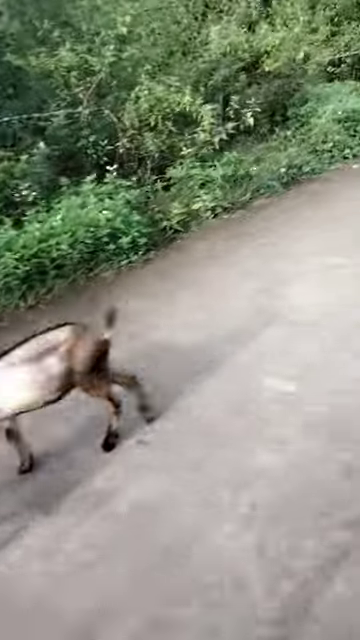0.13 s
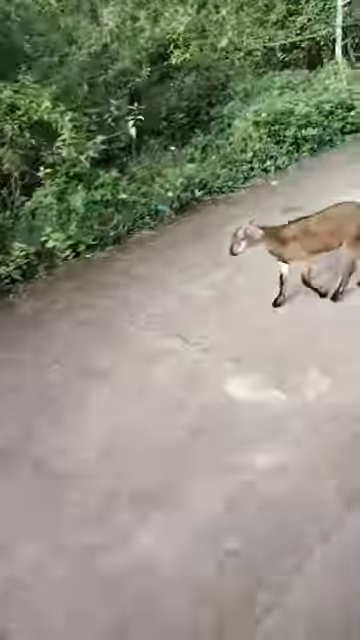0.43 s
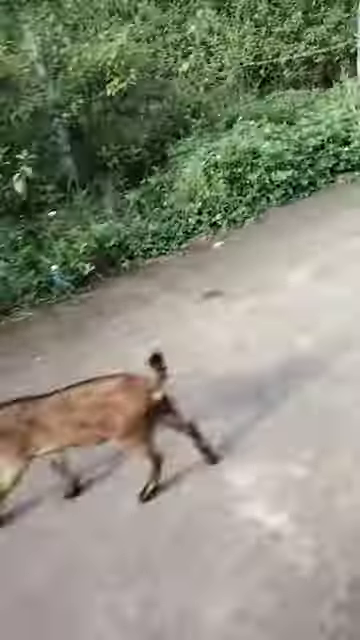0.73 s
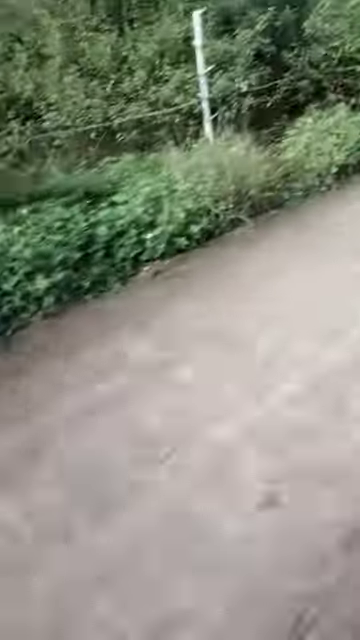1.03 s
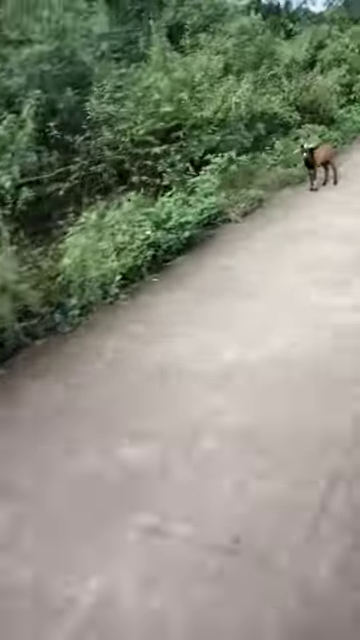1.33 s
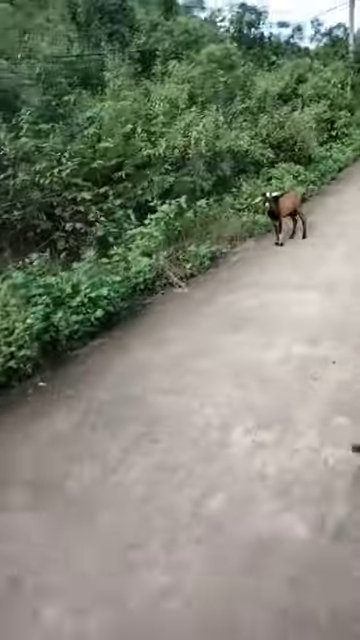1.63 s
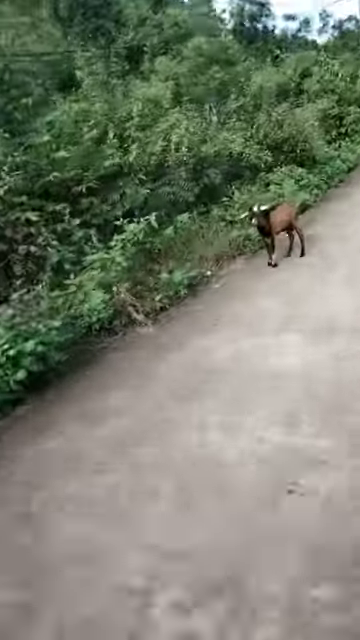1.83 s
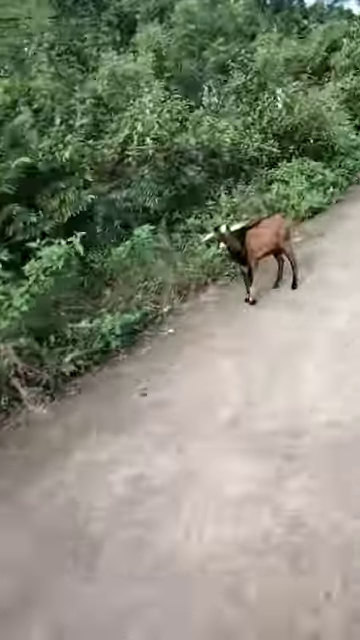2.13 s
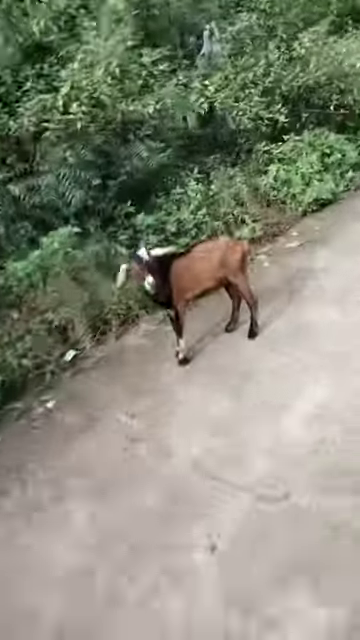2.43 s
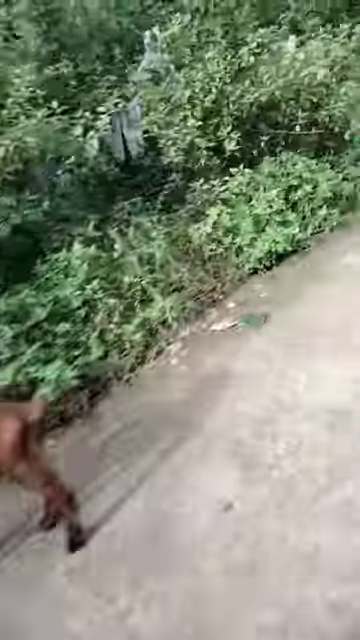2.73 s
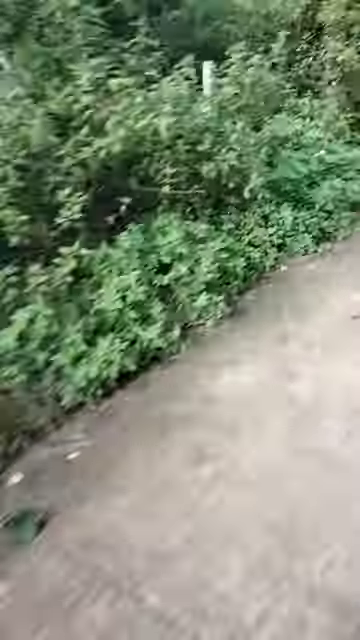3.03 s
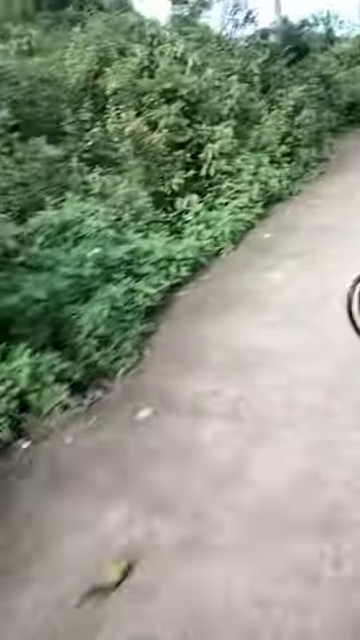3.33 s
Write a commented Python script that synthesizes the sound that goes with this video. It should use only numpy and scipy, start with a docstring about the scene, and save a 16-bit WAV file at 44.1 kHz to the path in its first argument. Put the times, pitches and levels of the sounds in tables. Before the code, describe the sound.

A motorbike rolls at low, nearly steady revs, about twenty soft exhaust pulses a second, heard close from the saddle outdoors. Casing clatter, tyre noise, faint whine and bright metallic sizzle run throughout. Wind buffets the microphone, with dull slaps and the strongest roar around 1.1-1.45 s, easing, then gusting again from 2.5 s to the end. Loose metal ticks at irregular moments, sharpest near 2.4 s.

```python
"""Motorbike on a concrete road

A single-cylinder motorbike rolls along a concrete country road at low revs, heard from the saddle.
Wind is shaped noise under gusts, with single slaps; the exhaust is about twenty pulses a second through
resonances. Noise bursts ring the casing over rolling noise and a faint whine. Sparse grains in shaped
noise make the running gear sizzle, and short bursts of the same colour make sharp ticks of loose metal.
"""
import sys
import numpy as np
from scipy import signal
from scipy.fft import rfft, irfft
from scipy.io import wavfile
from scipy.ndimage import map_coordinates

SR = 44100
rng = np.random.default_rng(int(sys.argv[2]) if len(sys.argv) > 2 else 0)


def put_to_file(sound):
    """Save the sound as 16-bit audio at rate SR, in the file named by the first command-line argument."""
    columns = np.atleast_2d(sound).T  # one column per channel
    safe = np.clip(columns, -1, 1)
    whole_steps = np.round(safe * 32767)
    wavfile.write(sys.argv[1], SR, whole_steps.astype(np.int16))


N = 153027

# Gusts pushing on the microphone. Each row: time in seconds, level in dB before BUFFET_TRIM_DB.
GUST_LEVEL = [(.1, -29), (.19, -21.5), (.265, -17.5), (.31, -33), (.385, -34), (.42, -27), (.52, -25.5),
              (.58, -30), (.62, -21.5), (.68, -30), (.8, -18), (.84, -24), (.91, -20), (1.2, -18.5),
              (1.25, -19), (1.42, -16.5), (1.47, -27), (1.55, -24.5), (1.59, -24), (1.63, -33), (1.7, -25),
              (1.76, -30.5), (2.12, -26.5), (2.45, -29.5), (2.5, -18), (2.56, -34), (2.65, -18.5),
              (2.72, -20), (2.79, -18), (2.93, -20), (3.05, -18), (3.09, -25.5), (3.13, -20), (3.2, -24.5),
              (3.25, -18.5), (3.35, -21.5), (3.47, -20.5)]
# Spectrum of the slow buffeting. Each row: frequency in Hz, relative level in dB per Hz.
BUFFET_SPECTRUM = [(10, -8.5), (24, 0), (42, 0.5), (80, -3.5), (130, -3.5), (220, -13), (400, -26),
                   (800, -55), (3000, -94)]
# Spectrum of the quicker eddies. Each row: frequency in Hz, relative level in dB per Hz.
EDDY_SPECTRUM = [(50, -20), (130, -5), (260, 2.5), (500, -4.5), (700, -11.5), (950, -20), (1350, -27.5),
                 (2200, -39.5), (4000, -68), (8000, -95)]
# Roar of the small eddies. Each row: time in seconds, level in dB before the change of treble.
EDDY_LEVEL = [(.1, -38), (.25, -35.5), (.32, -43), (.56, -43.5), (.8, -36.5), (.87, -32.5), (.95, -32),
              (1.22, -26.5), (1.34, -22.5), (1.42, -24.5), (1.5, -34.5), (1.87, -31.5), (1.98, -36.5),
              (2.03, -30), (2.08, -38), (2.2, -33.5), (2.33, -37.5), (2.48, -32.5), (2.55, -35.5),
              (2.63, -29.5), (2.9, -29.5), (3.0, -29.5), (3.08, -26.5), (3.17, -28), (3.28, -28),
              (3.37, -27.5), (3.47, -28.5)]
# Single eddies slapping the microphone.
# Each row: start in seconds, level in dB before SLAP_TRIM_DB, decay to 1/e in seconds.
SLAPS = [(0.109, -22.5, 0.011), (.174, -24, 0.0074), (.24, -21.5, 0.023), (.419, -20, 0.011),
         (0.631, -27, 0.013), (.748, -21.5, 0.0098), (0.788, -16, 0.0097), (0.976, -24, 0.035),
         (1.117, -14.5, 0.014), (1.167, -12, 0.017), (1.242, -19.5, 0.015), (1.3, -18, 0.0096),
         (1.333, -13.5, 0.012), (1.427, -10.5, 0.007), (1.583, -23, 0.01), (1.712, -22, 0.015),
         (1.817, -24.5, 0.036), (1.906, -21, 0.012), (2.021, -24.5, 0.013), (2.123, -20, .014),
         (2.498, -20, 0.013), (2.572, -19, 0.0079), (2.6, -17.5, 0.02), (2.648, -18.5, 0.0089),
         (2.786, -31, .009), (2.972, -24, 0.0081), (3.023, -19, 0.044), (3.186, -17.5, 0.0094),
         (3.255, -19, 0.013)]
# Spectrum of a slap. Each row: frequency in Hz, relative level in dB per Hz.
SLAP_SPECTRUM = [(40, -4.5), (130, -2.5), (250, 2), (480, -7.5), (700, -15), (1100, -26), (2200, -50),
                 (4000, -75), (8000, -95)]
# Spectrum of the metallic sizzle. Each row: frequency in Hz, relative level in dB per Hz.
SIZZLE_SPECTRUM = [(2000, -12), (3600, -11.5), (4800, -17), (5500, -16.5), (6300, -10.5), (7400, -6.5),
                   (8700, 2.5), (9800, -1.5), (11000, -11), (12500, -15), (15500, -15.5)]
# Course of the sizzle. Each row: time in seconds, level in dB relative to SIZZLE_DB.
SIZZLE_LEVEL = [(.1, 2), (.55, -1.5), (.92, 3), (1.17, -1), (1.7, -1.5), (2.1, 0), (2.33, 3), (2.52, -1),
                (2.83, 2.5), (2.91, 0), (3.1, 3), (3.47, 0)]
# Ticks of loose metal. Each row: start in seconds, level in dB before TICK_TRIM_DB, length to 1/e
# in seconds, knock of the bracket in dB relative to the tick, centre of a faint added ring in Hz.
TICKS = [(0.3242, -27.5, 0.01, -4.5, 8900), (.6807, -33.5, 0.0055, -30, 8800),
         (0.829, -34, .0025, -20, 8300), (1.106, -33.5, 0.0083, -2, 8700), (1.264, -30, 0.003, -25, 8900),
         (1.3766, -28.5, .0075, 1.5, 8950), (1.772, -35, 0.0043, -20, 9000),
         (2.138, -27.5, 0.0075, -17, 7950), (2.317, -36, 0.0033, -21, 7800),
         (2.33, -31.5, 0.0041, -19, 8700), (2.3995, -22.5, 0.0044, -8, 8800),
         (3.165, -30.5, 0.0039, -26, 8700), (3.285, -32.5, 0.0069, -6, 8700),
         (3.429, -31, 0.011, -5.5, 9300)]
# Spectrum of tyres and machinery. Each row: frequency in Hz, relative level in dB per Hz.
ROLL_SPECTRUM = [(150, 4), (420, 3), (750, 0), (1200, -3.5), (1700, -3.5), (2450, -9.5), (3500, -12.5),
                 (4700, -23.5), (7000, -15)]
# Course of tyres, machinery and whine. Each row: time in seconds, relative level in dB.
ROLL_LEVEL = [(.1, 3), (.55, -0.5), (1.0, 0), (1.6, 1.5), (2.1, 3.5), (2.7, 4.5), (3.47, 2)]
# Ringing of the engine casing.
# Each row: frequency in Hz, nominal width in Hz, relative level in dB before any flicker.
CASING_MODES = [(1482.4, 24, 12), (1790, 20, 8.5), (1956, 23, 3), (2182, 65, 3.5), (2710, 99, -3.5),
                (3021, 38, 3.5), (3655, 110, -8.5), (4180, 120, -6)]
# Engine speed. Each row: time in seconds, rate in firings per second.
FIRING_RATE = [(.1, 21.0), (.5, 20.5), (1.0, 19.9), (2.0, 19.8), (3.47, 19.7)]
# Exhaust resonances. Each row: frequency in Hz, width in Hz, relative level in dB.
PIPE_MODES = [(41, 2.5, -9), (99.4, 10.5, 15), (129, 77, 3), (272, 140, -10)]

BUFFET_TRIM_DB, BUFFET_FLUTTER_DB, EDDY_FLUTTER_DB, FLUTTER_HZ = 2, 2.5, 4.5, 70.26
# treble grows as this power of the roar: a gain above EDDY_BRIGHT_DB, a loss below it
EDDY_GROWTH, EDDY_BRIGHT_HZ, EDDY_BRIGHT_DB = 1.6, 730, -31.5
SLAP_TRIM_DB, SLAP_RISE_S, SLAP_RAGGED_DB, SLAP_RAGGED_HZ = 0.5, 0.0027, 2.5, 161.4
# the levels of whine, casing and roll are relative to ROLL_LEVEL
WHINE_HZ, WHINE_DB, WHINE_WAVER, WHINE_FLUTTER_DB = 1465, -58.5, 0.0106, 3.5
ROLL_DB, ROLL_FLUTTER_DB = -44, 2.0
CASING_DB, CLATTER_DECAY_S, CLATTER_FLOOR = -52.5, 0.013, 0.42
CASING_FLICKER_DB, CASING_FLICKER_HZ, CASING_WAVER, CASING_WAVER_HZ = 5, 21.99, 0.01096, 24.1
# grain shares are shares of power
SIZZLE_DB, SIZZLE_GRAINS_PER_S, SIZZLE_SCATTER_DB, SIZZLE_GRAIN_SHARE = -44, 900, 8, 0.25
SIZZLE_THROB, SIZZLE_FLUTTER_DB = 0.061, 1.66
TICK_TRIM_DB, TICK_CONTACTS_PER_S, TICK_GRAIN_SHARE, TICK_RISE_S = -0.5, 670, 0.23, 0.00061
TICK_RING_WIDTH_HZ, TICK_RING_DB, TICK_CASING_DB = 770, -14.5, -10.5
KNOCK_HZ, KNOCK_WIDTH_HZ, KNOCK_LAG_S, KNOCK_DECAY_S = 1440, 130, 0.0034, 0.0058
EXHAUST_DB, FIRING_SCATTER_DB, FIRING_JITTER_S = -35.5, 4.5, 0.00023
START_S, FADE_S, CEILING, TOP_HZ = 0.085, 0.016, 0.73, 15600


def undb(db):
    """Logarithmic level: 20 dB is a tenfold amplitude."""
    return 10 ** (np.asarray(db) / 20)


def unit(x):
    """Normalisation: the rms becomes 1."""
    return x / np.sqrt(np.mean(x ** 2))


def curve(rows):
    """Linear interpolation: straight lines join the (seconds, value) rows."""
    return np.interp(np.arange(N) / SR, *np.array(rows, float).T)


def noise():
    """White noise: equal power at all frequencies."""
    return rng.standard_normal(N)


def colour(x, points):
    """Spectral shaping: x is weighted by (Hz, dB) points on a log-frequency axis, at rms 1."""
    hz, db = np.array(points, float).T
    f = np.maximum(np.arange(N // 2 + 1) * SR / N, 1)
    gain = undb(np.interp(np.log(f), np.log(hz), db))
    return unit(irfft(rfft(x) * gain, N))


def resonate(x, hz, width):
    """Resonance: a second-order peak with gain 1 at its centre."""
    return signal.lfilter(*signal.iirpeak(hz, hz / width, fs=SR), x)


def resonate_twice(x, hz, width):
    """Cascaded resonance: two equal peaks of doubled width give steeper flanks."""
    return resonate(resonate(x, hz, 2 * width), hz, 2 * width)


def walk(rate):
    """Random modulation: a smooth curve at rms 1 through `rate` random points per second."""
    steps = rng.standard_normal(4000)
    return unit(map_coordinates(steps, [np.arange(N) / SR * rate], order=2, mode="wrap"))


def waver(x, depth, rate):
    """Frequency modulation: a wandering reading speed shifts the pitch by a small share."""
    position = np.arange(N) + np.cumsum(depth * walk(rate))
    return map_coordinates(x, [position], order=3, mode="mirror")


def mix_grains(grains, share):
    """Addition of power: grains and steady noise are uncorrelated, so their powers add."""
    return np.sqrt(share) * unit(grains) + np.sqrt(1 - share) * noise()


def wind():
    """Turbulent pressure: gusts push on the microphone, and eddies roar brighter as they grow."""
    flutter = np.tanh(walk(FLUTTER_HZ) / 2) * 2
    buffet = colour(noise() * undb(BUFFET_FLUTTER_DB * flutter), BUFFET_SPECTRUM)
    eddies = colour(noise() * undb(EDDY_FLUTTER_DB * flutter), EDDY_SPECTRUM)
    low_pass = signal.butter(2, EDDY_BRIGHT_HZ, fs=SR, output="sos")
    body = signal.sosfiltfilt(low_pass, eddies)
    treble = eddies - body
    roar_db = curve(EDDY_LEVEL)
    treble_gain = undb(roar_db - EDDY_BRIGHT_DB) ** (EDDY_GROWTH - 1)
    roar = undb(roar_db) * (body + treble_gain * treble)
    return undb(BUFFET_TRIM_DB + curve(GUST_LEVEL)) * buffet + roar


def slaps():
    """Transient pressure: an eddy hits the microphone with a quick rise and a dull, ragged tail."""
    t = np.arange(N) / SR
    push = np.zeros(N)
    for start, db, decay in SLAPS:
        rise = np.clip((t - start) / SLAP_RISE_S, 0, 1)
        tail = np.exp(-np.maximum(t - start - SLAP_RISE_S, 0) / decay)
        push += undb(db) * rise * tail
    ragged = noise() * undb(SLAP_RAGGED_DB * np.tanh(walk(SLAP_RAGGED_HZ)))
    return undb(SLAP_TRIM_DB) * push * colour(ragged, SLAP_SPECTRUM)


def whine():
    """Modulated sinusoid: a thin tone, probably of the gears, wavers in pitch and level."""
    hz = WHINE_HZ * (1 + WHINE_WAVER * walk(40))
    tone = np.sin(2 * np.pi * np.cumsum(hz) / SR)
    fluttering = unit(tone * undb(WHINE_FLUTTER_DB * walk(35.32)))
    return undb(WHINE_DB + curve(ROLL_LEVEL)) * fluttering


def sizzle(cycles):
    """Granular friction: tiny metal contacts, probably of the chain, throb with the engine."""
    struck = rng.random(N) < SIZZLE_GRAINS_PER_S / SR
    strength = undb(SIZZLE_SCATTER_DB * np.minimum(rng.exponential(size=N), 4))
    contacts = mix_grains(struck * np.sign(noise()) * strength, SIZZLE_GRAIN_SHARE)
    throb = 1 + SIZZLE_THROB * np.cos(2 * np.pi * 5 * cycles)  # five swells per firing
    moving = contacts * throb * undb(SIZZLE_FLUTTER_DB * walk(110))
    return colour(moving, SIZZLE_SPECTRUM) * undb(SIZZLE_DB + curve(SIZZLE_LEVEL))


def ticks():
    """Impact excitation: loose metal chatters for milliseconds and knocks its bracket and the casing."""
    t = np.arange(N) / SR
    contacts = unit((rng.random(N) < TICK_CONTACTS_PER_S / SR) * np.sign(noise()))
    chatter = colour(mix_grains(contacts, TICK_GRAIN_SHARE), SIZZLE_SPECTRUM)
    bracket = unit(resonate_twice(noise(), KNOCK_HZ, KNOCK_WIDTH_HZ))
    casing = unit(sum(resonate(contacts, hz, width) for hz, width, _ in CASING_MODES))
    dull = unit(bracket + undb(TICK_CASING_DB) * casing)

    def fade(start, decay):
        """Envelope: a linear rise under a Gaussian decay."""
        return np.clip((t - start) / TICK_RISE_S, 0, 1) * np.exp(-((t - start) / decay) ** 2)

    total = np.zeros(N)
    for start, db, length, knock_db, ring_hz in TICKS:
        ring = undb(TICK_RING_DB) * resonate(chatter, ring_hz, TICK_RING_WIDTH_HZ)
        tick = unit(chatter + ring) * fade(start, length)
        knock = undb(knock_db) * dull * fade(start + KNOCK_LAG_S, KNOCK_DECAY_S)
        total += undb(db) * (tick + knock)
    return undb(TICK_TRIM_DB) * total


def machinery(cycles):
    """Forced resonance: clatter on every crank turn rings the casing, over the rolling of the tyres."""
    # two crank turns per firing
    since_turn_s = (2 * cycles % 1) / (2 * curve(FIRING_RATE))
    clatter = noise() * (CLATTER_FLOOR + np.exp(-since_turn_s / CLATTER_DECAY_S))
    rings = np.zeros(N)
    for hz, width, db in CASING_MODES:
        flicker_db = CASING_FLICKER_DB * np.tanh(walk(CASING_FLICKER_HZ))
        rings += undb(db + flicker_db) * resonate_twice(clatter, hz, width)
    casing = unit(waver(rings, CASING_WAVER, CASING_WAVER_HZ))
    roll = colour(noise(), ROLL_SPECTRUM) * undb(ROLL_FLUTTER_DB * walk(60))
    return (undb(CASING_DB) * casing + undb(ROLL_DB) * roll) * undb(curve(ROLL_LEVEL))


def exhaust(cycles):
    """Pulse excitation: each firing sends a slightly uneven puff through the resonant silencer."""
    at = np.flatnonzero(np.diff(np.floor(cycles)))
    chance = rng.standard_normal((len(at), 2))
    shift = (chance[:, 0] * FIRING_JITTER_S * SR).astype(int)
    puffs = np.zeros(N)
    puffs[np.clip(at + shift, 0, N - 1)] = undb(FIRING_SCATTER_DB * chance[:, 1])
    pipe = sum(undb(db) * resonate(puffs, hz, width) for hz, width, db in PIPE_MODES)
    low_pass = signal.butter(2, 450, fs=SR, output="sos")
    return undb(EXHAUST_DB) * unit(signal.sosfilt(low_pass, pipe))


def scene():
    """Superposition: the pressures of wind and bike add at one microphone."""
    cycles = np.cumsum(curve(FIRING_RATE)) / SR  # firings so far
    background = wind() + slaps()
    running_gear = whine() + sizzle(cycles) + ticks()
    engine = machinery(cycles) + exhaust(cycles)
    return (background + running_gear + engine)[None]


def record(dry):
    """Saturation and band limiting: the sound fades in, its peaks are rounded and the top is cut."""
    opened = np.clip((np.arange(N) / SR - START_S) / FADE_S, 0, 1)
    rounded = CEILING * np.tanh(dry * opened / CEILING)
    low_pass = signal.ellip(10, .2, 80, TOP_HZ, fs=SR, output="sos")
    return signal.sosfilt(low_pass, rounded)


dry = scene()
out = record(dry)
put_to_file(out)
```